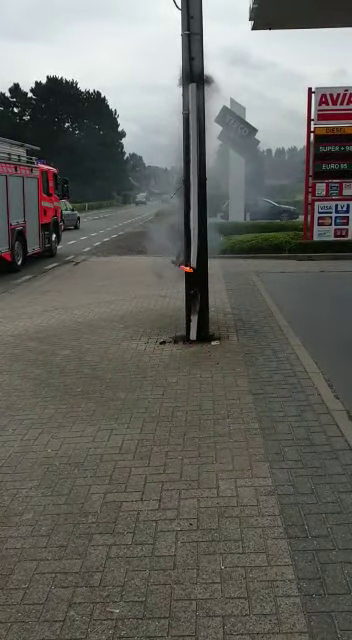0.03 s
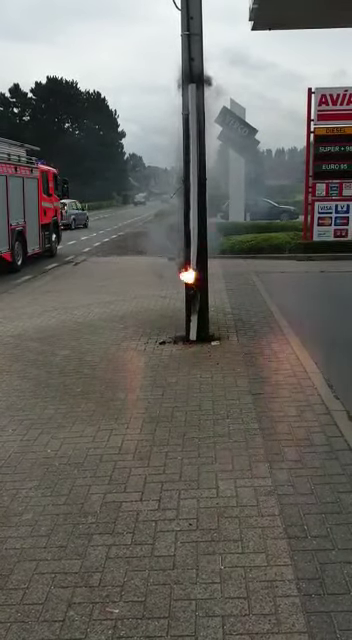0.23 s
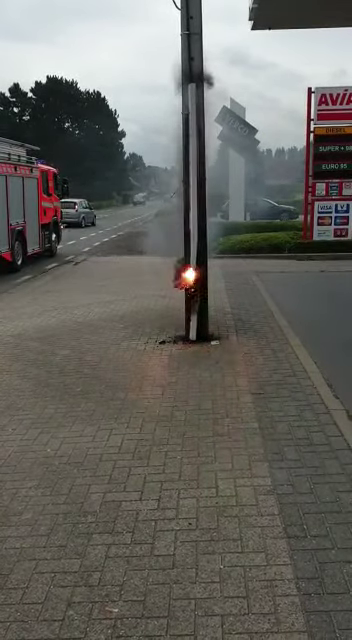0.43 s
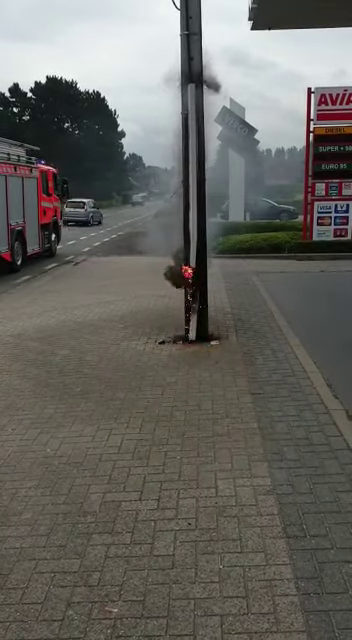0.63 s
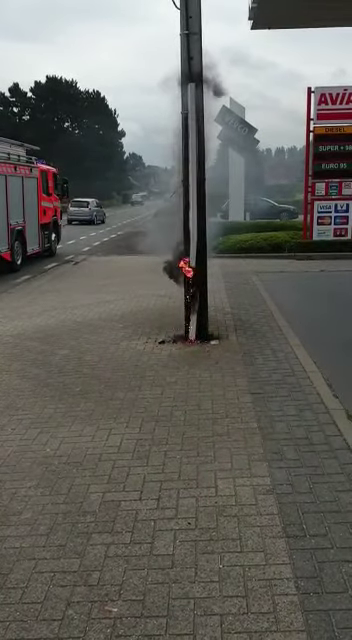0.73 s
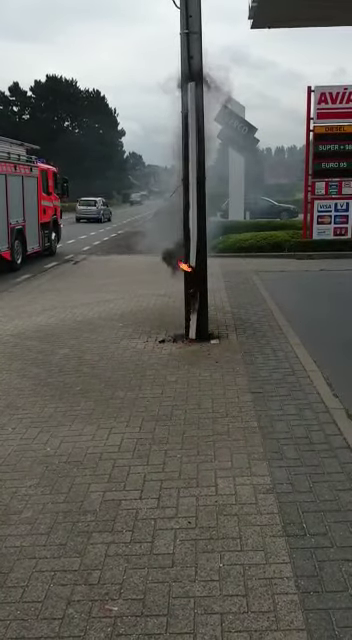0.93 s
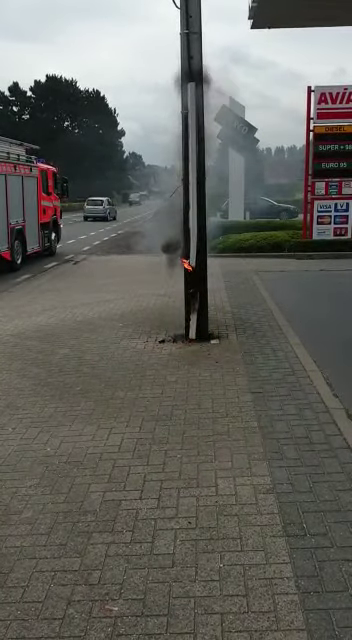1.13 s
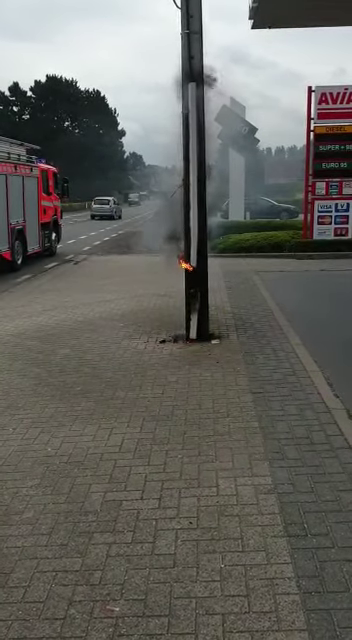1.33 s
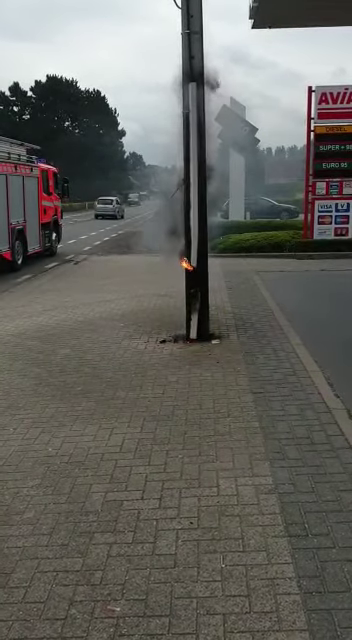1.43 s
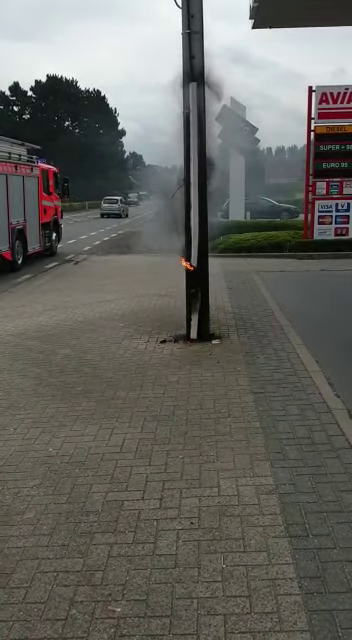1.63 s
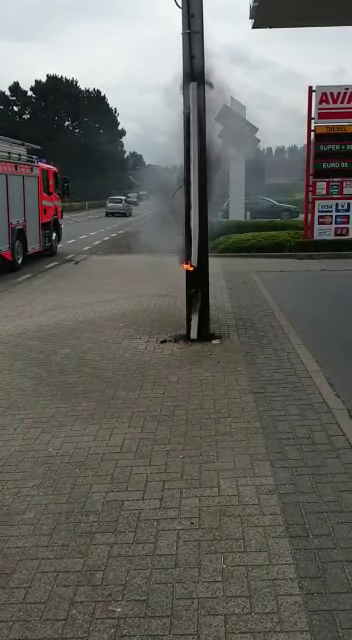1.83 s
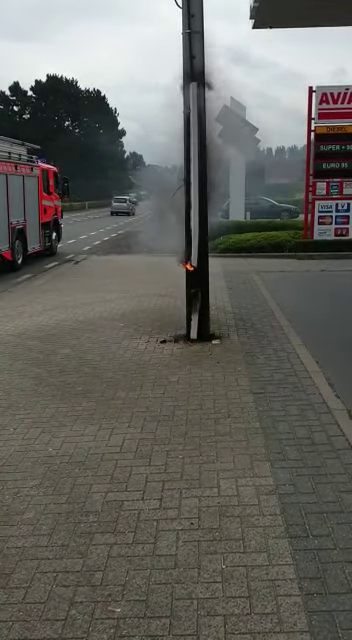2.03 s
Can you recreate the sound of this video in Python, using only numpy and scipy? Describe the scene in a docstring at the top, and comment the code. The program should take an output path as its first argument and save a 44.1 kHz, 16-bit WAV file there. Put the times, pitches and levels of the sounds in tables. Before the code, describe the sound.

Sharp electrical pops and rapid crackling echo along a street while a fire engine idles.

```python
"""An electric arc pops and crackles on a burning utility pole beside a road.
It strikes in single pops and in short runs, once per half cycle of the mains power.
Each strike is a small blast with a spit of sizzle; the paving and the buildings throw it back.
A fire engine idles nearby, over distant traffic and a faint hiss."""
import sys
import numpy as np
from scipy import signal
from scipy.fft import rfft, irfft
from scipy.io import wavfile
from scipy.ndimage import uniform_filter1d

SR = 44100
rng = np.random.default_rng(int(sys.argv[2]) if len(sys.argv) > 2 else 0)


def output_pcm(signal):
    """Save a mono or channel-first signal as 16-bit PCM at the path in sys.argv[1].

    Samples are clipped to [-1, 1] before scaling.
    """
    pcm = np.clip(np.atleast_2d(signal).T, -1, 1) * 32767
    wavfile.write(sys.argv[1], SR, np.round(pcm).astype(np.int16))


N = 92610  # 2.1 seconds


def amp(db):
    """Turns decibels into a number to multiply a sound by."""
    return 10 ** (np.asarray(db) / 20)


def unit(x):
    """Scales a signal so that its average strength (rms) is one."""
    return x / np.sqrt(np.mean(x ** 2) + 1e-20)


def read(points, hz, column=1):
    """Looks up a table at any pitch, sliding smoothly between its rows."""
    table = np.array(points, float)
    return np.interp(np.log(hz + 1), np.log(table[:, 0] + 1), table[:, column])


def add(mix, start_s, sound):
    """Adds a sound to the mix at a given time."""
    part = mix[max(round(start_s * SR), 0):][:len(sound)]
    part += sound[:len(part)]


def pulse(db_at, size=4096):
    """The shortest click with a given tone; db_at gives its level at each pitch."""
    cepstrum = irfft(np.log(amp(db_at(np.fft.rfftfreq(size, 1 / SR)))))
    cepstrum[1:size // 2] *= 2  # this line and the next pack the energy at the start
    cepstrum[size // 2 + 1:] = 0
    return irfft(np.exp(rfft(cepstrum)))


def through(x, response):
    """Gives a sound the tone or the echo of another sound."""
    return signal.fftconvolve(x, response)[:N]


def delayed(x, delay_s):
    """Delays a sound, even by less than one sample."""
    hz = np.fft.rfftfreq(2 * N, 1 / SR)
    return irfft(rfft(x, 2 * N) * np.exp(-2j * np.pi * hz * delay_s))[:N]


def drift(rate_hz):
    """A smooth random wobble; a higher rate makes it quicker."""
    smoothing = np.exp(-(np.fft.rfftfreq(N, 1 / SR) / rate_hz) ** 2)
    return unit(irfft(rfft(rng.standard_normal(N)) * smoothing, N))


def paired(a, b, likeness):
    """Makes left and right from two noises: likeness 1 is the same, 0 unrelated, -1 opposite."""
    likeness = np.clip(likeness, -1, 1)
    return np.array([a, likeness * a + np.sqrt(1 - likeness ** 2) * b])


def engine():
    """The idling fire engine drones at multiples of its firing rate; the lowest tone swells and sinks."""
    # tones of the drone: multiple, level_db
    tones = [(1, -51), (2, -54.5), (3, -65), (4, -67), (6, -60), (8, -59), (10, -64), (12, -62),
             (16, -70.5)]
    # throb of the lowest tone: time_s, boost_db
    throb = [(0, -14), (.12, -6), (.9, -1), (1.0, 3), (1.2, 4), (1.43, 2), (1.55, -9.5), (1.8, 3.5),
             (1.96, -12), (2.06, 4)]
    firing_hz, waver, flutter_db = 76, 0.004, 2
    firings = np.cumsum(firing_hz * (1 + waver * drift(rate_hz=3.83))) / SR
    throb_db = np.interp(np.arange(N) / SR, *np.transpose(throb))
    drone = np.zeros(N)
    for multiple, db in tones:
        level_db = db + flutter_db * drift(rate_hz=7.6) + throb_db * (multiple == 1)
        drone += amp(level_db) * np.sqrt(2) * np.sin(2 * np.pi * (multiple * firings + rng.random()))
    return drone


def traffic(size=2048):
    """Road rumble and tyre noise come in drifting patches and swell as cars near."""
    # tone of the road: pitch_hz, relative_db
    tone = [(20, -17), (50, 1.5), (75, -5), (110, -6.5), (170, -7.5), (240, -6), (350, -11), (520, -10.5),
            (950, -13), (1500, -20.5), (2400, -28), (3500, -44), (6500, -53.5), (16000, -80)]
    # how alike left and right are: pitch_hz, likeness
    likeness = [(50, 0.71), (140, 1), (300, .88), (640, 0.94), (1400, 0.68), (3000, -1.34), (7000, -0.098)]
    # swells of the traffic: time_s, rumble_db, tyres_db
    swells = [(0, -49, -49), (.17, -40.5, -47.5), (1.0, -46, -48.5), (1.302, -51.5, -47),
              (1.65, -46.5, -47.5), (1.8, -42, -46), (2.1, -47, -46)]
    patch_db, tyres_from_hz = 2.54, 300
    hz, _, noise = signal.stft(rng.standard_normal((2, N)), SR, nperseg=size)
    patches = uniform_filter1d(rng.standard_normal(noise.shape[1:]), size=12, axis=0)  # blur over pitch
    patches = unit(uniform_filter1d(patches, size=8, axis=1))  # blur over time
    spectrum = paired(*noise, read(likeness, hz)[:, None])
    spectrum *= amp(read(tone, hz)[:, None] + patch_db * patches)
    road = unit(signal.istft(spectrum, SR, nperseg=size)[1][:, :N])
    rumble = signal.sosfiltfilt(signal.butter(2, tyres_from_hz, fs=SR, output="sos"), road)
    tyres = road - rumble
    time_s, rumble_db, tyres_db = np.transpose(swells)
    t = np.arange(N) / SR
    return rumble * amp(np.interp(t, time_s, rumble_db)) + tyres * amp(np.interp(t, time_s, tyres_db))


def hiss(level_db=-72):
    """Two microphones each make a faint, steady noise of their own."""
    # tone of the hiss: pitch_hz, relative_db
    tone = [(1000, -6), (6500, -0.5), (8000, -4), (11000, -2), (12500, -16), (16000, -23)]
    colour = pulse(lambda hz: read(tone, hz))
    return amp(level_db) * unit(np.array([through(noise, colour) for noise in rng.standard_normal((2, N))]))


def arc():
    """Each strike sends out one blast of air pressure with a rasping front, and a grainy sizzle."""
    # strikes of the arc: start_s, thump_db, crack_db, edge_db, sizzle_db
    strikes = [(0.2054, -8, -7, -18.5, -20), (0.2178, -27, -13, -28, -40), (.2362, -28, -27, -43, -34),
               (0.2446, -10, -8.5, -10.5, -19), (0.2537, -13.5, -23, -30, -18.5),
               (0.2648, -6, -14.5, -22.5, -30), (.2743, -10.5, -9.5, -12.5, -24.5),
               (0.2863, -12, -21.5, -23, -23), (0.2953, -8.5, -9.5, -14, -39),
               (0.3476, -22.5, -14, -10.5, -29.5), (.3641, -32.5, -22.5, -19.5, -36),
               (.3655, -19, -11, -12, -23), (.3667, -35, -15.5, -16, -42), (0.3758, -15.5, -25.5, -32, -28),
               (.3848, -12, -10.5, -19.5, -18.5), (0.3944, -11.5, -9.5, -22.5, -22),
               (0.4054, -11, -17, -14, -26), (0.4155, -12, -23.5, -19.5, -19), (0.426, -8.5, -26, -35, -27),
               (0.436, -8, -10, -17, -26), (.4472, -13, -14.5, -25, -33), (0.456, -9.5, -10, -15.5, -29.5),
               (0.4664, -14.5, -15.5, -22, -31), (0.4748, -20, -32, -17.5, -24),
               (0.4857, -17.5, -23.5, -23.5, -28), (.5070, -39, -31, -46, -45),
               (0.5152, -12, -15, -17.5, -23), (0.5239, -13.5, -15, -19, -16.5),
               (0.5347, -10.5, -13, -24, -19), (0.6058, -20, -14.5, -14, -29),
               (0.6236, -21.5, -13.5, -27, -32.5), (0.7361, -28.5, -13.5, -21, -19),
               (.7384, -41.5, -24.5, -45, -52), (0.7464, -18, -20.5, -27, -32.5)]
    # tone of a blast: pitch_hz, boost_db
    blast_tone = [(20, -28), (50, 16.5), (85, 34.5), (200, 37), (350, 36.5), (650, 35), (1050, 32.5),
                  (1400, 28.5), (2000, 26), (2700, 28), (4200, 18), (8000, -0.5), (16000, 1)]
    # tone of its ragged front: pitch_hz, boost_db
    rasp_tone = [(300, -27), (1200, -14.5), (1900, 0.5), (2800, -9.5), (4000, -11.5), (5300, 1),
                 (7000, -23.5), (16000, -47)]
    # tone of the sizzle: pitch_hz, boost_db
    sizzle_tone = [(200, -14.5), (1500, 6), (3500, 12), (5200, 3.5), (6800, -6.5), (8500, -9), (11500, 4.5),
                   (14000, -1.5), (16000, -3.5)]
    thump_hz, crack_from_hz, crack_to_hz, edge_hz = 231, 410, 1200, 1730
    rasp_fade_s, sizzle_delay_s, spit_s = 0.0023, 0.00067, 0.00089
    afterglow_db, afterglow_s = -22, 0.006  # the hot gas hisses on briefly
    blasts, front, heat = np.zeros((3, N))
    t = np.arange(N) / SR
    for start_s, thump_db, crack_db, edge_db, sizzle_db in strikes:
        balance = [(thump_hz, thump_db), (crack_from_hz, crack_db),
                   (crack_to_hz, crack_db), (edge_hz, edge_db)]
        add(blasts, start_s, pulse(lambda hz: read(blast_tone, hz) + read(balance, hz)))
        add(front, start_s, amp(edge_db) * np.exp(-t[:SR // 50] / rasp_fade_s))
        age = t - start_s - sizzle_delay_s
        spit = np.exp(-abs(age) / spit_s)  # rises and falls equally fast
        afterglow = amp(afterglow_db) * np.exp(-abs(age) / afterglow_s) * (age >= 0)
        heat += amp(sizzle_db) * (spit + afterglow)
    rasp = through(front * rng.standard_normal(N), pulse(lambda hz: read(rasp_tone, hz)))
    grains = unit(rng.standard_normal(N) * amp(3 * drift(rate_hz=2900)))
    sizzle = through(heat * grains, pulse(lambda hz: read(sizzle_tone, hz)))
    return blasts + amp(-3.5) * rasp + amp(5) * sizzle


def reverberation(size=256):
    """The street's answer to a click: quick scatter from things nearby, then a long tail."""
    # ring of the street: pitch_hz, early_db, late_db, late_fade_s (to fall 60 dB), left_right_likeness
    ring = [(80, -20, -20.5, 1, 0.98), (219, -1.5, -8, 0.73, 1), (498, -3.5, -6.5, 0.72, .6),
            (880, -7, -14, 0.49, 0.79), (1150, -2, -8.5, .8, 0.15), (2000, -1, -9, 0.64, 0.26),
            (3550, -9, -13.5, 0.66, 0.2), (5000, -10, -15, 0.49, 0), (7200, -7.5, -10.5, 0.52, 0.057),
            (8500, -6, -28, 0.42, 0.064), (12000, -12, -19, 0.33, 0.039), (14800, -20, -16.5, .38, 0.071),
            (16000, -26, -37.5, .3, 0)]
    early_fade_s, early_rise_s, late_rise_s = 0.11, 0.0013, 0.012
    scatter = unit(rng.standard_normal((2, N)) * amp(4 * np.clip(drift(rate_hz=900), -2, 2)))
    hz, t, spectrum = signal.stft(scatter, SR, nperseg=size)
    early_db, late_db, late_fade_s, likeness = (read(ring, hz, column=k)[:, None] for k in range(1, 5))
    power = 0
    for db, fade_s, rise_s in (early_db, early_fade_s, early_rise_s), (late_db, late_fade_s, late_rise_s):
        shape = ((1 - np.exp(-t / rise_s)) * np.exp(-np.log(1000) * t / fade_s)) ** 2
        power = power + amp(db) ** 2 * shape / (shape.mean(-1, keepdims=True) * N)
    return signal.istft(paired(*spectrum, likeness) * np.sqrt(power), SR, nperseg=size)[1][:, :N]


def street(sound):
    """The sound arrives from the left, bounces off the paving and echoes between the buildings."""
    # duller tone on the shaded right side: pitch_hz, boost_db
    shade = [(100, 0.5), (250, 0.5), (1000, -1), (2500, -0.5), (4500, -7.5), (8000, -17.5), (12000, -13),
             (16000, 0)]
    # echoes from nearby surfaces: delay_s, left_db, right_db
    echoes = [(.0046, -19.5, -21.5), (0.014, -14.5, -12.5), (.0252, -20, -18), (0.039, -21.5, -20.5),
              (.088, -22, -28.5), (.1, -27, -24.5), (.195, -35, -40)]
    bounce_s, right_lag_s, echo_lag_s, echo_top_hz = 0.001106, 0.0001, 0.00015, 4200
    left = sound + amp(-3) * delayed(sound, bounce_s)
    right = through(delayed(left, right_lag_s), pulse(lambda hz: read(shade, hz)))
    mix = np.array([left, right])
    dull = signal.sosfilt(signal.butter(2, echo_top_hz, fs=SR, output="sos"), left)
    for delay_s, left_db, right_db in echoes:
        mix[0] += amp(left_db) * delayed(dull, delay_s)
        mix[1] += amp(right_db) * delayed(dull, delay_s + echo_lag_s)
    return mix + np.array([through(sound, tail) for tail in reverberation()])


def scene():
    """The arc in the street, over the engine, the traffic and the hiss."""
    left, right = engine() + traffic()
    road = np.array([left, delayed(right, delay_s=0.00012)])  # the road lies to the left
    return street(arc()) + road + hiss()


def record(dry):
    """Rounds off the loudest peaks and cuts the highest treble."""
    rounded = dry / (1 + dry ** 6) ** (1 / 6)
    treble_cut = signal.firwin(255, cutoff=16500, window=("kaiser", 8), fs=SR)
    return signal.oaconvolve(rounded, treble_cut[None], "same")


dry = scene()
out = record(dry)
output_pcm(out)
```